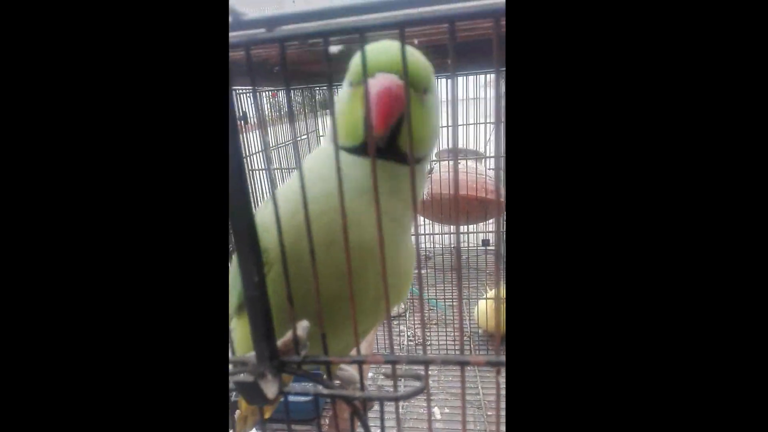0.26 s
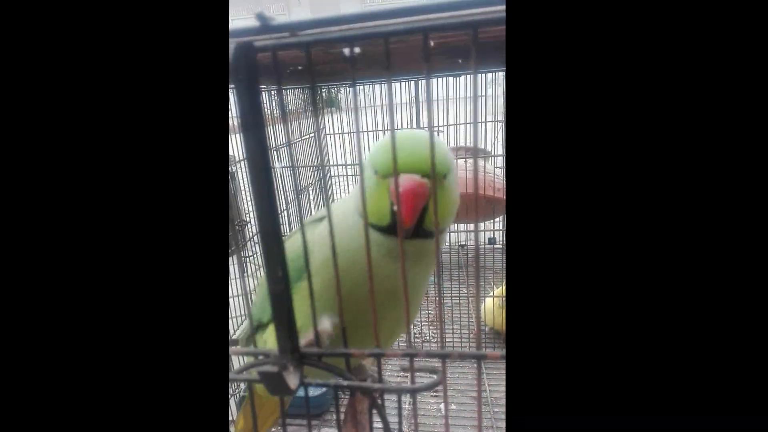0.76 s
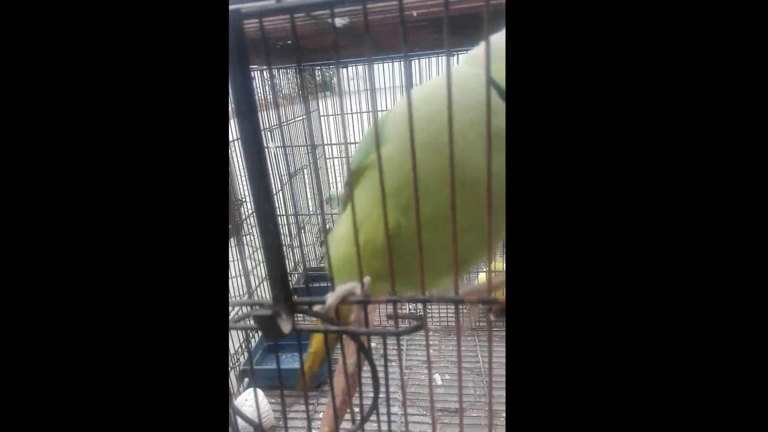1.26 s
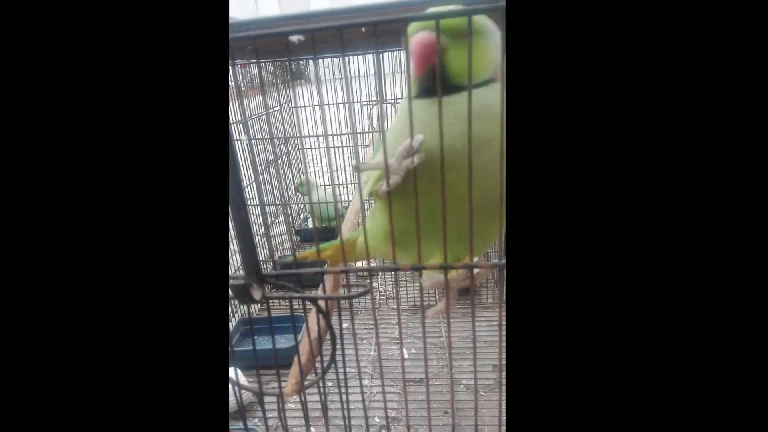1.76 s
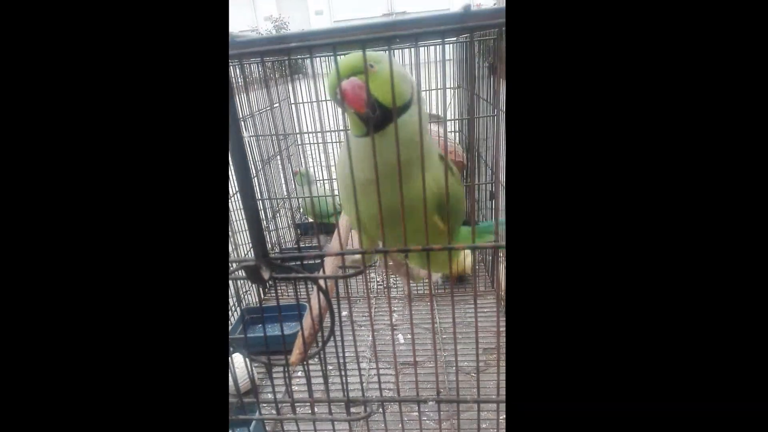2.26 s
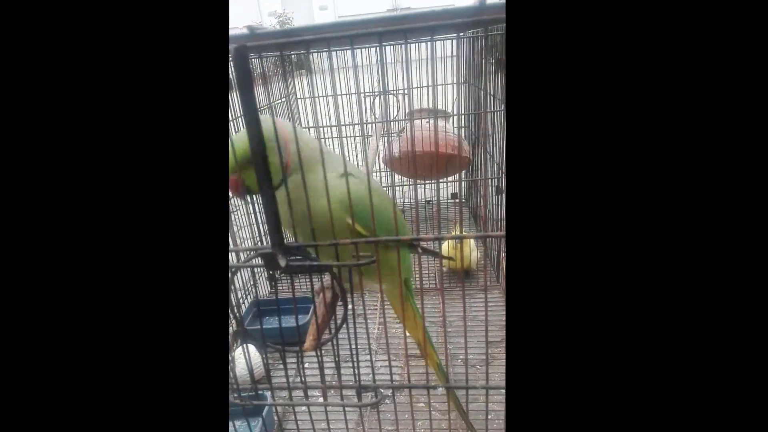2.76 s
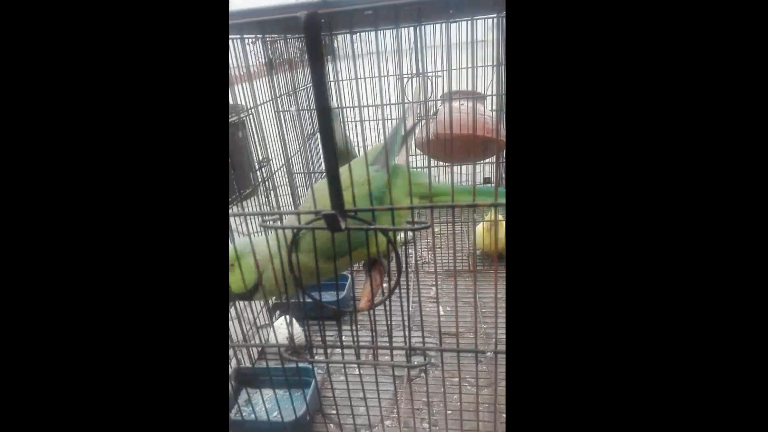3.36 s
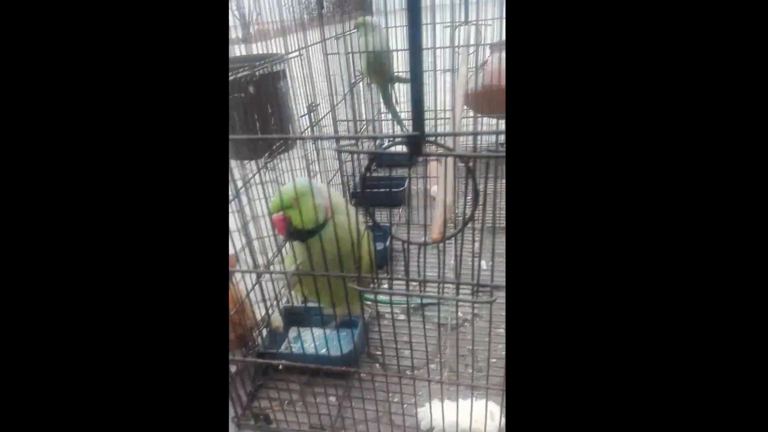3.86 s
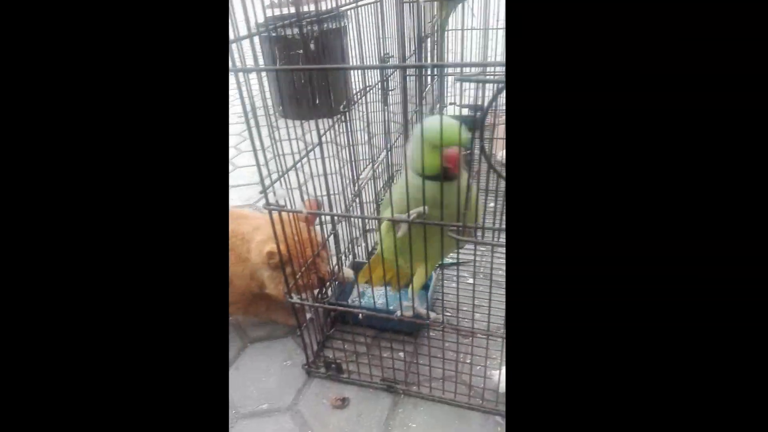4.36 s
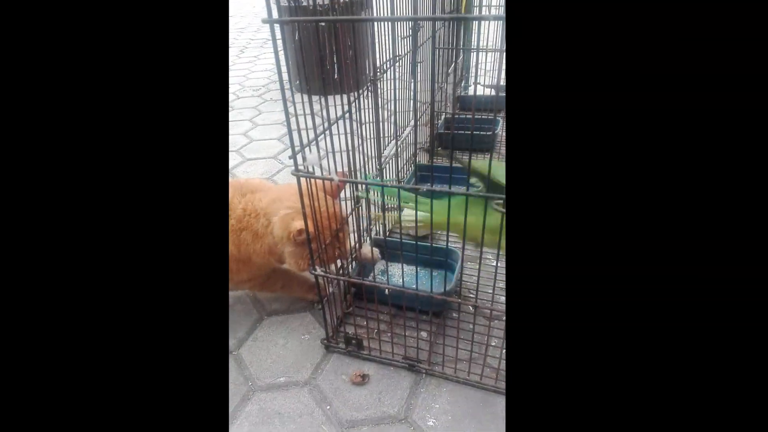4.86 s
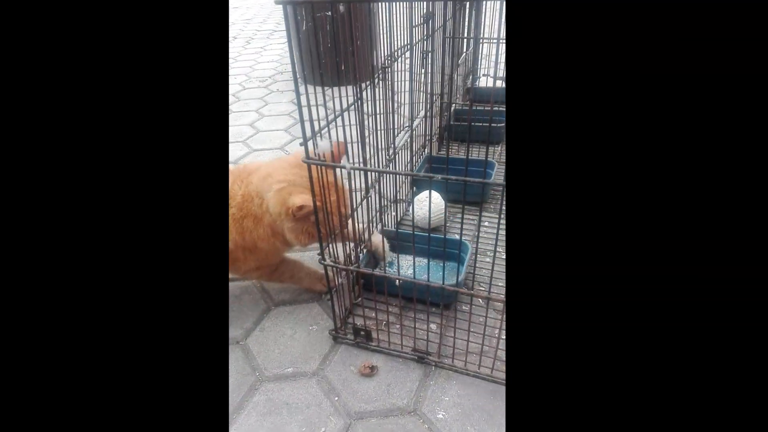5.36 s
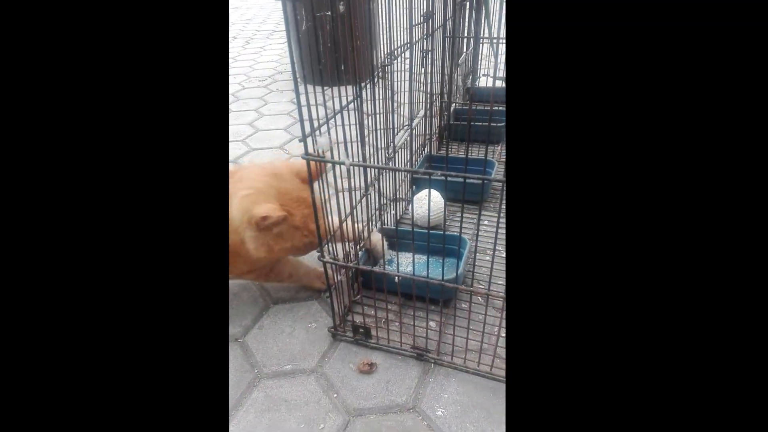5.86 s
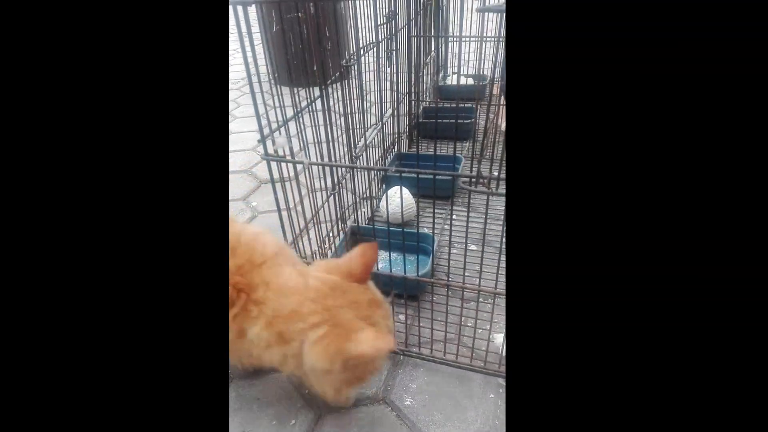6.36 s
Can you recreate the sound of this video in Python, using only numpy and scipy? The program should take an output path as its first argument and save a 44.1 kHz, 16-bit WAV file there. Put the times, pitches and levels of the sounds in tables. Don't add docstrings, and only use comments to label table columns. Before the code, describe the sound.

A low distant engine hum lies under faint bird whistles in an open yard. Near the microphone, bird claws click and scrape along cage wires, followed by two quick descending parakeet calls, the second much softer and lower. A loose plastic tray clacks loudly and bounces several times, setting the frame ringing briefly. The engine comes nearer, throbbing and roaring more towards the end.

```python
import sys
import numpy as np
from scipy import signal
from scipy.fft import irfft, next_fast_len
from scipy.io import wavfile
from scipy.ndimage import uniform_filter1d

SR = 44100
rng = np.random.default_rng(int(sys.argv[2]) if len(sys.argv) > 2 else 0)


def level_to_linear(level):
    exponent = np.asarray(level, float) / 20
    return 10 ** exponent


def master(y):
    cut = np.clip(np.atleast_2d(y).T, -1, 1)
    pcm = np.round(cut * 32767)
    wavfile.write(sys.argv[1], SR, pcm.astype(np.int16))


N = 290619

# (time [s], rumble level [dB])
ENGINE_LOAD = [(0.0, -42), (0.42, -56.5), (0.77, -50), (1.95, -50), (2.09, -40), (2.2, -46), (2.55, -40),
               (3.25, -37.5), (3.82, -40.5), (3.91, -36), (4.06, -45.5), (4.2, -42.5), (4.37, -42),
               (4.55, -42), (5.4, -37.5), (5.74, -33.5), (6.35, -35.5), (6.59, -33.5)]
# (frequency [Hz], level [dB per Hz])
RUMBLE = [(12, -26.5), (20, -10), (75, -7), (103, -5), (124, 3.5), (167, -7.5), (198, -12), (321, -21),
          (414, -28), (492, -33), (600, -45.5), (780, -70), (1320, -120)]
# (time [s], firing rate [Hz], share of rumble in clean lines [0-1])
FIRING = [(2.5, 16.9, .05), (3.2, 17.5, .8), (3.9, 18.05, .9), (4.6, 18.85, .9), (5.2, 19.2, .94),
          (5.9, 19.7, .95), (6.2, 19.95, .9), (6.4, 20.2, .35), (6.59, 20.3, .3)]
ORDERS_DB = [-12, -16, -9, -2, -1, -7, -6, -24, -18, -18, -12, -22, -19, -20, -21, -26, -27]
# (frequency [Hz], level [dB])
PIPE = [(50, 0), (90, -1), (112, 1), (140, 0), (162, 3), (178, -6), (205, 1), (320, 0)]
# (frequency [Hz], level [dB per Hz])
ROAR_COLOUR = [(290, -1.5), (500, 6), (700, -4), (942, 2.5), (1250, 0), (1710, 0), (1970, -0.5),
               (4810, -3.5), (9300, -15), (11000, -29), (14300, -71), (22000, -120)]
# (frequency [Hz], level [dB per Hz])
AIR = [(240, -37), (400, -15), (672, -3), (1380, 1), (2490, -4.5), (3330, -5.5), (6420, -15), (12900, -17),
       (14400, -16.5), (15300, -53)]
# (start [s], length [s], level as grip starts [dB], as it lets go [dB], frame relative [dB])
SCRAPES = [(0, 0.12, -58.5, -83, -13), (1.04, 0.054, -66, -62.5, -18), (1.241, 0.15, -52, -70.5, -5.5),
           (1.362, 0.055, -55, -53, -21), (1.442, 0.096, -60, -68.5, -6), (1.68, 0.049, -59, -55.5, -6),
           (1.744, 0.14, -47.5, -55, -8.5), (2.003, 0.076, -39.5, -56, -9.5),
           (2.094, 0.12, -44.5, -57.5, -0.5), (2.21, 0.16, -56, -75, 4), (2.362, 0.1, -47, -66.5, -3),
           (2.571, 0.058, -82, -55.5, 3.5), (2.753, 0.16, -74, -69, -0.5), (3.173, 0.12, -76, -55.5, -13),
           (3.477, 0.22, -59, -71, 1.5), (3.636, 0.35, -60, -73, -4), (3.967, 0.15, -61.5, -58.5, -6.5),
           (4.203, 0.19, -77, -61.5, 2), (4.622, 0.19, -65, -78, -30), (4.836, 0.26, -60.5, -57.5, -32),
           (5.218, 0.041, -48.5, -59, -11), (5.418, 0.25, -62, -66.5, -0.5), (5.647, 0.1, -66, -58, -1),
           (6.235, 0.15, -56.5, -81, 7)]
# (frequency [Hz], width [Hz], level [dB])
CAGE = [(1000, 1600, -26), (1403, 400, 9.5), (1890, 4000, 6), (2610, 280, 11), (3490, 310, -8)]
# (frequency [Hz], width [Hz], level [dB])
BARS = [(1410, 150, 0), (1630, 120, -2), (2080, 200, -8), (2620, 130, -4), (3420, 170, -2), (5750, 260, -9)]
# (time [s], level [dB])
FRAME_HUM = [(2.05, -95), (2.3, -68), (2.6, -80), (3.1, -73.5), (3.17, -75), (3.32, -68), (3.85, -72),
             (4.15, -77), (4.55, -73), (4.75, -111), (5.03, -58), (5.09, -58), (5.3, -73), (6.59, -60)]
# (start [s], driven time [s], frequency [Hz], level [dB])
WIRES = [(0, 0.15, 5700, -59.5), (0, 0.059, 8500, -65), (0, 0.034, 11800, -61), (0, 0.23, 3300, -64),
         (1.055, 0.1, 4960, -65), (1.055, 0.063, 11100, -65.5), (1.06, .07, 6700, -72),
         (1.231, 0.11, 1000, -59), (1.235, 0.093, 2640, -57.5), (1.229, 0.0033, 13300, -58),
         (1.38, .2, 5700, -64), (1.39, .03, 11900, -54), (1.39, .03, 8200, -59), (2.775, 0.079, 11660, -66),
         (2.782, 0.12, 8570, -65), (4.0, 0.024, 9300, -57), (4.078, 0.035, 11300, -57),
         (4.269, 0.041, 8550, -64), (4.27, 0.044, 11500, -70), (4.36, 0.023, 11500, -59.5),
         (4.359, 0.14, 8300, -58.5), (4.464, 0.18, 9640, -61), (4.64, 0.031, 10600, -63.5),
         (4.64, 0.045, 6600, -60), (4.64, 0.046, 13800, -69), (5.221, 0.033, 11400, -62),
         (5.44, 0.025, 10800, -63), (5.54, 0.03, 10600, -65), (5.729, 0.012, 11000, -58.5),
         (5.844, 0.019, 10800, -54.5), (1.742, .03, 9300, -46), (1.742, .035, 12000, -44.5),
         (1.745, .05, 13900, -54), (1.76, .1, 8400, -49), (2.007, .025, 13100, -48),
         (2.007, 0.022, 11300, -46), (2.25, 0.024, 12000, -58), (2.26, .07, 8600, -64),
         (2.28, 0.073, 5860, -60), (1.245, .04, 9100, -68), (1.235, 0.081, 3900, -57),
         (1.436, 0.011, 3500, -61), (2.39, .06, 3500, -58.5), (3.118, .006, 9700, -53),
         (2.575, 0.026, 9600, -58.5), (4.36, 0.14, 5500, -61), (4.337, 0.063, 3000, -59),
         (3.645, 0.026, 4000, -52.5), (4.0, .06, 6000, -65), (4.112, 0.023, 1530, -46.5)]
# (frequency [Hz], level [dB], time to fall 60 dB [s])
PING = [(6164, -9, .15), (8226, -5, .35), (8489, 0, .22), (9179, -3, .18), (11830, -11, .25),
        (12050, -7, .3), (12630, -10, .15), (13890, -9, .18)]
# (time [s], level [dB])
PING_HITS = [
    (1.742, -50),
    (1.759, -44.5),
]
# (time [s], peak level [dB], centre frequency [Hz])
TICKS = [(1.2298, -31, 4320), (1.3723, -38, 9400), (1.378, -39, 5700), (1.4328, -26, 7240),
         (1.4404, -38, 3420), (1.6867, -33, 7850), (1.7423, -28, 6270), (1.7594, -28, 8950),
         (1.9034, -32, 5500), (2.0063, -43, 6140), (2.07, -36, 5070), (2.0985, -24.5, 4320),
         (2.1051, -19, 6320), (2.343, -35, 3450), (2.365, -23, 5230), (2.3713, -28, 3120),
         (2.6105, -51, 3060), (3.316, -38.5, 4200), (3.465, -36.5, 4000), (3.467, -40, 6450),
         (1.9845, -45, 5000), (3.5608, -42, 5600), (4.0048, -38, 9500), (4.081, -40, 11400),
         (4.335, -44, 3220), (4.359, -42, 5600), (4.951, -32, 5500), (5.034, -48, 3100),
         (5.225, -36, 11600), (5.44, -33, 5900), (5.843, -40, 5340), (5.033, -35, 8500),
         (1.229, -40, 13000), (1.4338, -34, 7000), (1.442, -43, 6200), (1.3955, -43, 12000),
         (1.7425, -29, 12300), (2.0065, -41, 12000), (2.0985, -35, 13200), (2.105, -31, 12000),
         (2.1505, -38, 3000), (2.252, -32, 3000), (4.95, -37, 8200), (3.515, -40.5, 3750),
         (3.6263, -49, 2700), (3.9968, -44, 3310), (4.4613, -50, 4400), (4.5201, -53, 4740),
         (5.168, -49, 4600)]
# (time [s], centre frequency [Hz])
TOUCHES = [(.1027, 8240), (1.5715, 5530), (2.4844, 3520), (2.5509, 3300), (2.576, 8950), (3.063, 3160),
           (4.2657, 3280), (4.4636, 9800)]
# (start [s], length [s], start pitch [Hz], end pitch [Hz], level [dB])
FAR = [(.27, .11, 2650, 2950, -75), (.35, .28, 2950, 2970, -72), (.54, .09, 3200, 3300, -77),
       (.81, .24, 3400, 3150, -73), (.9, .25, 3060, 2950, -72), (1.055, .09, 4900, 4800, -70),
       (3.375, .17, 3350, 3200, -65), (3.695, .13, 3500, 3420, -61), (4.45, .13, 1420, 1380, -67)]
NOTES = [(3.32, .06, 4850, 4800, -65), (3.325, .14, 4320, 4280, -63), (3.343, .033, 3720, 3600, -51),
         (3.38, .04, 3640, 3700, -53), (3.42, .04, 3650, 3600, -60), (3.363, .03, 2990, 2930, -52),
         (3.4, .06, 2980, 2950, -56), (3.47, .035, 3750, 3630, -58), (3.47, .035, 2960, 2950, -58),
         (3.53, .05, 3650, 3720, -62), (3.352, .025, 7400, 7300, -69), (3.385, .05, 7330, 7350, -70),
         (4.64, .075, 3980, 4080, -68), (4.735, .07, 4300, 4700, -68), (4.8, .1, 4400, 4450, -72),
         (4.4, .26, 2620, 2590, -69)]
# (time [s], peak level [dB], crack level [dB], tilt [dB per octave])
KNOCKS = [(1.229, -47, -10, -12), (1.435, -29.5, -6, 10.5), (1.452, -35, -11, 12), (1.6876, -37, -17, 8),
          (1.7425, -39, -16, 10), (2.186, -7, -2.5, 9), (2.1916, -22, -12, -5), (2.2003, -22, -10, -10),
          (2.215, -41, -15, -5), (2.225, -25, -20, 7), (2.343, -30.5, -24, -3), (2.3684, -28, -12, 5.5),
          (2.6238, -29.5, -4.5, -15), (3.1143, -8.5, -7, 7.5), (3.1411, -16.5, -6.5, 6.5),
          (3.16, -27, 2.5, 0), (3.513, -38, -15, 15), (3.645, -40.5, -12, -8), (4.294, -49, -16, 0.5),
          (4.1095, -21.5, -7.5, 1.5), (4.9525, -40, -14, -6), (4.9635, -36.5, 3, 1), (5.0465, -15, -1.5, 5),
          (5.059, -18, -15, -2.5), (5.0745, -26, -9, 0), (5.1807, -35, -6, -4), (5.3446, -37, -9, -8),
          (6.145, -39, -3, 23), (6.155, -35.5, -15, 6), (6.163, -32.5, 0, 24), (6.2046, -11.5, -6, 1.5),
          (6.2292, -21, -6, 0), (6.235, -26, -7, -10)]
# (frequency [Hz], width [Hz], level [dB])
TRAY = [(1480, 180, 8.5), (1710, 500, 10.5), (1908, 113, 8), (2680, 300, 9), (3294, 600, 5),
        (4780, 730, -7.5), (5090, 370, -11), (5700, 210, -29), (6000, 290, -67), (6700, 860, -25.5),
        (8200, 74, -49)]
# (frequency [Hz], width [Hz], level [dB])
RINGS = [(1380, 60, -1), (1620, 50, 3), (1850, 70, -6), (2130, 60, -6), (2650, 60, -13), (3500, 50, 0)]
# (time [s], pitch [Hz], level [dB])
CALL_HIGH = [(1.832, 1990, -56), (1.843, 1961, -21.5), (1.868, 2019, -22), (1.885, 1977, -23),
             (1.9, 1803, -25.5), (1.92, 1614, -35.5), (1.943, 1550, -52)]
# (time [s], pitch [Hz], level [dB])
CALL_LOW = [(1.978, 928, -48), (1.99, 839, -48.5), (2.01, 751, -46.5), (2.027, 692, -49), (2.034, 632, -64),
            (2.048, 670, -53)]
# (frequency [Hz], level [dB])
THROAT_HIGH = [(1500, -9.5), (2100, -5), (3400, -19.5), (4000, -28.5), (5200, -13), (6000, -37),
               (8000, -37), (11000, -61.5)]
# (frequency [Hz], level [dB])
THROAT_LOW = [(600, 8.5), (900, -6), (1450, 7.5), (1800, 3), (2500, 2), (3200, -21), (4300, -25),
              (5150, -1), (5600, -18), (7200, -11), (9000, -32.5)]


def curve(table):
    s, *columns = np.transpose(table)
    return [np.interp(np.arange(N) / SR, s, c) for c in columns]


def span(table, tail_s):
    s, *columns = np.transpose(table)
    t = np.arange(s[0], s[-1] + tail_s, 1 / SR)
    return t, *(np.interp(t, s, c) for c in columns)


def colour(points, hz):
    f, db = np.transpose(points)
    return np.interp(np.log(np.maximum(hz, 1)), np.log(f), db)


def unit(x):
    return x / np.sqrt(np.mean(x ** 2))


def noise(points, lo_hz=0, hi_hz=SR):
    size = next_fast_len(N, True)
    hz = np.arange(size // 2 + 1) * SR / size
    chance = rng.standard_normal(len(hz)) + 1j * rng.standard_normal(len(hz))
    inside = (hz >= lo_hz) * (hz < hi_hz)
    return unit(irfft(chance * level_to_linear(colour(points, hz)) * inside, size)[:N])


def resonance(x, hz, width_hz):
    return signal.lfilter(*signal.iirpeak(min(hz, SR / 2.2), hz / width_hz, fs=SR), x)


def passing(x, order, edge_hz, kind):
    return signal.sosfilt(signal.butter(order, edge_hz, kind, fs=SR, output="sos"), x)


def walk(rate, size=N):
    k = int(SR / rate)
    held = np.repeat(rng.standard_normal(size // k + 1), k)[:size]
    return unit(uniform_filter1d(held, k))


def add(out, s, x):
    i = int(s * SR)
    out[i:i + len(x)] += x[:N - i]


def cage(x):
    y = sum((-1) ** k * level_to_linear(db) * resonance(x, f, w) for k, (f, w, db) in enumerate(CAGE))
    return passing(y, 2, [750, 4500], "bandpass")


def engine():
    t = np.arange(N) / SR
    hz, share = curve(FIRING)
    phase = 2 * np.pi * np.cumsum(hz) / SR

    def nearing(far_db, db_per_s):
        return far_db + db_per_s * np.maximum(t - 2.16, 0)

    def order_line(k, db):
        brighter = 1.34 * (np.clip(k, 13, 16) - 15) * (k > 11) * (t - 4.6)
        unsteady = (1.6 + .16 * k) * walk(3)
        level = level_to_linear(db + colour(PIPE, k * hz) + brighter + unsteady)
        return level * np.sin(k * phase + .08 * k * walk(4) + k * k)

    gust_db = 6.5 * np.exp(-((t - 0.58) / 0.12) ** 2)
    thud_db = nearing(-53, 1.8) + gust_db
    growl_db = nearing(-66, 3.77) + 8.5 * share
    # (low edge [Hz], high edge [Hz], how clean the firings can get [0-1], level [dB])
    bands = [(0, 84, .35, thud_db), (84, 200, 1, curve(ENGINE_LOAD)[0]), (200, 600, .93, growl_db)]
    low = 0
    for lo, hi, clean, db in bands:
        orders = [(k, g) for k, g in enumerate(ORDERS_DB, start=3) if lo <= k * hz[N // 2] < hi]
        lines = unit(sum(order_line(k, g) for k, g in orders))
        rumble = noise(RUMBLE, lo, hi)
        low = low + level_to_linear(db) * (np.sqrt(clean * share) * lines + np.sqrt(1 - clean * share) * rumble)
    roar = level_to_linear(nearing(-88, 8.29) + .8 * walk(6))
    rustle = level_to_linear(-64 - 61 * np.abs(t - 2.08))
    return low + (roar + rustle) * noise(ROAR_COLOUR)


def scrapes():
    hiss, body = np.zeros(N), np.zeros(N)
    for s, length, grip_db, end_db, body_db in SCRAPES:
        t, db = span([(0, grip_db), (length, end_db)], 0.19)
        rise_s = 0.051 if end_db > grip_db + 3 else 0.0025
        gate = np.minimum(t / rise_s, 1) * np.exp(-np.maximum(t - length, 0) / 0.044)
        lingers_db = 0.057 * np.maximum(grip_db - db, 0)
        add(hiss, s, gate * level_to_linear(db))
        add(body, s, gate * level_to_linear(db + body_db + lingers_db))
    slips = level_to_linear(1.3 * walk(300))
    wire = [(2500, -14.0), (4200, 6.0), (6000, 6.0), (9000, 5), (13500, -3.5), (15000, -60.5)]  # Hz, dB
    bright = 0
    for f in np.arange(3000, 15000, 600.):
        patchy_db = 2.2 * walk(14) + 1.5 * walk(150)
        bright = bright + level_to_linear(colour(wire, f) + patchy_db) * noise(wire, f, f + 600)
    bars = 0
    for f, w, db in BARS:
        hum = resonance(resonance(rng.standard_normal(N), f, w), f, 2 * w)
        bars = bars + level_to_linear(db + 1.8 * walk(9)) * unit(hum)
    humming = (level_to_linear(curve(FRAME_HUM)[0]) + level_to_linear(-4) * body) * unit(bars)
    rattle = body * unit(cage(slips * rng.standard_normal(N)))
    return humming + hiss * unit(slips * bright) + rattle


def wires():
    out = np.zeros(N)
    for s, driven, hz, db in WIRES:
        width = np.clip(20 / driven, hz / 22, 920)
        t = np.arange(int((driven + .3) * SR)) / SR
        hum = unit(resonance(resonance(rng.standard_normal(len(t)), hz, width), hz, 2 * width))
        fade = np.exp(-t / 0.063 - np.maximum(t - driven, 0) / 0.026)
        add(out, s, level_to_linear(db) * hum * np.minimum(t / 0.00069, 1) * fade)
    t = np.arange(SR // 2) / SR
    ping = sum(level_to_linear(g) * np.sin(2 * np.pi * f * t) * 1000 ** (-t / t60) for f, g, t60 in PING)
    for s, db in PING_HITS:
        add(out, s, level_to_linear(db) * ping)
    return out


def ticks():
    out, t = np.zeros(N), np.arange(SR // 30) / SR
    touch_db = -50.5
    for s, db, hz in TICKS + [(s, touch_db, hz) for s, hz in TOUCHES]:
        fade = np.exp(-t / 0.0058) + 2.6 * np.exp(-t / 0.00028)
        burst = rng.standard_normal(len(t)) * fade
        tick = 0.29 * resonance(burst, hz, hz) + 2.1 * resonance(burst, hz, 0.1 * hz)
        add(out, s, level_to_linear(db) * tick / np.abs(tick).max())
    return passing(out, 2, 2500, "highpass")


def far_birds():
    out = np.zeros(N)
    hoarse_rate = 380
    for s, length, hz0, hz1, db, rough in [(*row, 1) for row in FAR] + [(*row, .17) for row in NOTES]:
        u = np.linspace(0, 1, int(length * SR))
        bend = 1 - (1 - u) ** 1.51
        warble = 1 + rough * .013 * walk(70, size=SR)[:len(u)]
        tone = np.exp(2j * np.pi * np.cumsum((hz0 + (hz1 - hz0) * bend) * warble) / SR)
        smear = (walk(hoarse_rate, size=SR) + 1j * walk(hoarse_rate, size=SR))[:len(u)]
        swell = np.sin(np.pi * u ** .7) ** .5
        add(out, s, level_to_linear(db) * swell * np.imag((.6 + .85 * rough ** .7 * smear) * tone))
    return out


def tray():
    out, blows, t = np.zeros(N), np.zeros(N), np.arange(SR // 10) / SR
    snap_hz, snap_s = 3580, 0.000775
    slap_s, slap_db = .0043, -11
    gaps = np.diff(np.array(KNOCKS)[:, 0], prepend=0)
    for (s, db, crack_db, tilt_db), gap in zip(KNOCKS, gaps):
        bounce = gap < .045 and db < -15
        damp, bright_hz = (0.87, 3000) if bounce else (0.56, 4670)
        mix = rng.standard_normal((len(TRAY), 2)) * [1.6, .012]
        burst = rng.standard_normal(len(t))
        ring = 0
        for (f, w, g), (extra_db, detune) in zip(TRAY, mix):
            size = w * level_to_linear(g + extra_db + tilt_db * np.log2(f / 2500))
            fade = np.exp(-np.pi * .6 * w * damp * t)
            ring = ring + size * np.sin(2 * np.pi * f * (1 + detune) * t) * fade
        settle = level_to_linear(-17) + np.exp(-(t * damp / .007) ** 4)
        ring = ring * np.minimum(t / .0006, 1) * settle
        sizzle = np.exp(-t / 0.0011) + level_to_linear(-15.5) * np.exp(-t / 0.026)
        crack = resonance(burst, bright_hz, 1.9 * bright_hz) * sizzle
        snap = np.sin(2 * np.pi * snap_hz * (t - snap_s)) * np.exp(-((t - snap_s) * snap_hz / 0.28) ** 2)
        hit = ring / np.abs(ring).max() + level_to_linear(crack_db) * (crack / 2 + level_to_linear(1.5) * snap)
        add(out, s, level_to_linear(db) * hit)
        add(out, s + slap_s, level_to_linear(db + slap_db) * hit)
        add(blows, s, level_to_linear(db) * np.ones(1))
    return passing(out, 3, [1000, 14500], "bandpass"), blows


def call(table, throat, rise_s):
    out, (t, hz, db) = np.zeros(N), span(table, 0)
    hz = uniform_filter1d(hz, size=400, mode="nearest")
    gate = np.clip(np.minimum(t - t[0], t[-1] - t) / rise_s, 0, 1)
    phase = 2 * np.pi * np.cumsum(hz * (1 + 0.0037 * walk(340)[:len(t)])) / SR
    stack = 0
    for k in range(1, 10):
        unsteady_db = 0.76 * (k - 1.5) * walk(225)[:len(t)]
        stack = stack + level_to_linear(colour(throat, k * hz) + unsteady_db) * np.sin(k * phase)
    add(out, t[0], np.sqrt(2) * gate * level_to_linear(db) * stack)
    return out


def yard(x, t60_s):
    t = np.arange(SR // 2) / SR
    tail = rng.standard_normal(len(t)) * 1000 ** (-t / t60_s) * (t > .006)
    tail = signal.lfilter([1], [1, -.6], tail)
    return signal.fftconvolve(x, tail / np.sqrt(np.sum(tail ** 2)))[:N]


def echoes(voice, knocks, blows):
    wet = level_to_linear(-19.5) * yard(voice, 0.74) + level_to_linear(-21.5) * yard(knocks, 0.16)
    wet = wet + level_to_linear(-37.0) * cage(yard(knocks, 0.96)) + level_to_linear(-1.5) * cage(yard(blows, 0.37))
    floor_pan = resonance(resonance(yard(np.abs(knocks), 0.5), 780, 530), 500, 590)
    shaken = yard(knocks, 0.8)
    bars = sum(level_to_linear(db) * resonance(shaken, f, w) for f, w, db in RINGS)
    return wet + level_to_linear(-20) * floor_pan + level_to_linear(-13) * bars


def scene():
    voice = call(CALL_HIGH, THROAT_HIGH, 0.0091) + call(CALL_LOW, THROAT_LOW, 0.0066)
    knocks, blows = tray()
    far = far_birds()
    far = far + level_to_linear(-9) * yard(far, .4)
    first_contact = level_to_linear(-6) * passing(blows, 2, 9000, "highpass")
    near = first_contact + voice + knocks + ticks() + scrapes() + wires()
    air = level_to_linear(-68) * noise(AIR)
    return (near + echoes(voice, knocks, blows) + far + engine() + air)[None]


def top_cut(x):
    return signal.sosfilt(signal.butter(12, 15450, fs=SR, output="sos"), x)


def record(dry):
    dull = signal.sosfilt(signal.ellip(8, .5, 50, 14300, fs=SR, output="sos"), dry)
    return top_cut(dull)


dry = scene()
out = record(dry)
master(out)
```